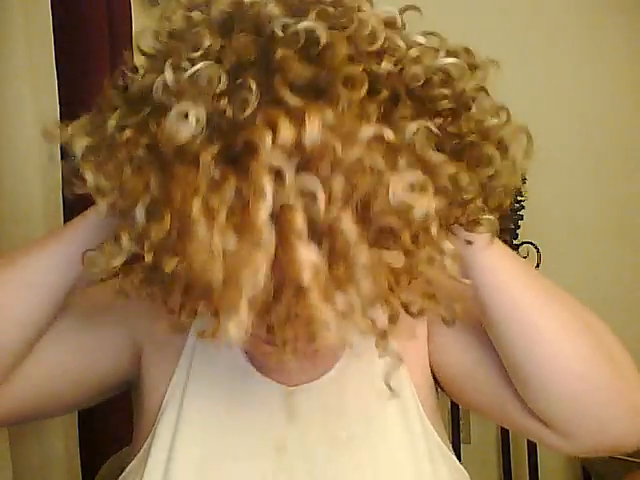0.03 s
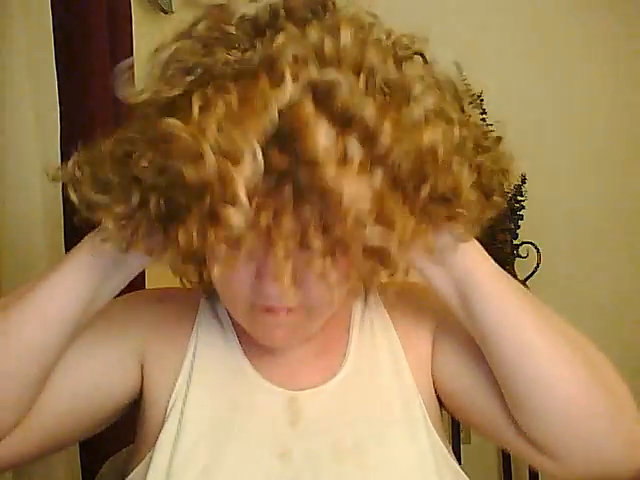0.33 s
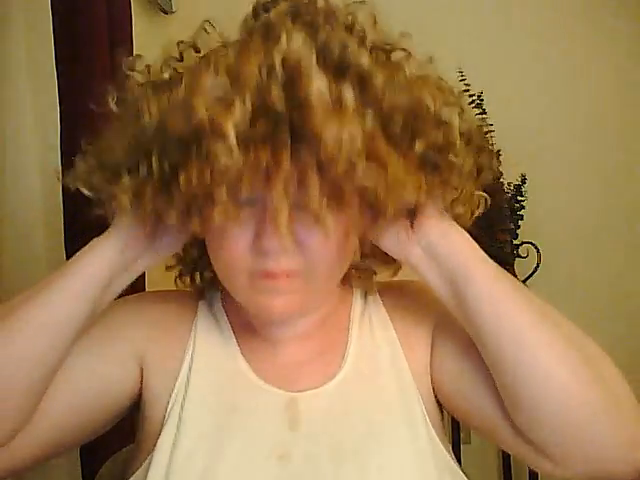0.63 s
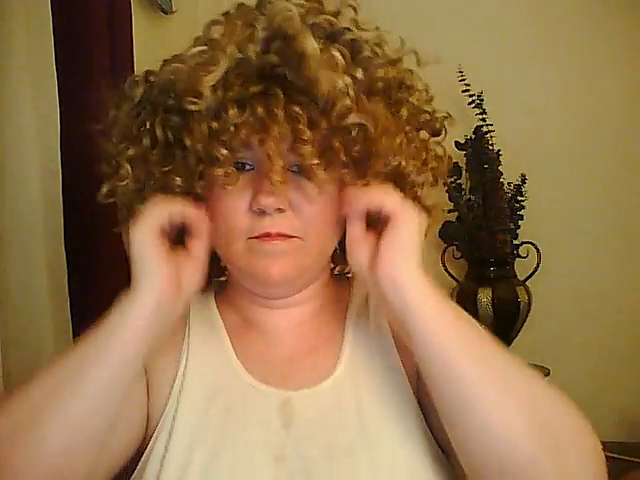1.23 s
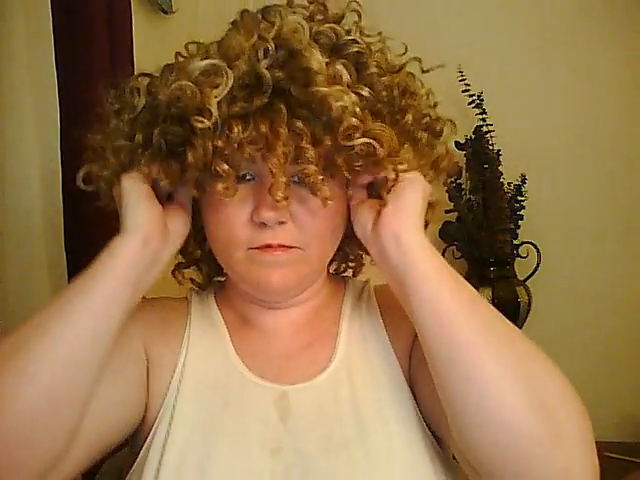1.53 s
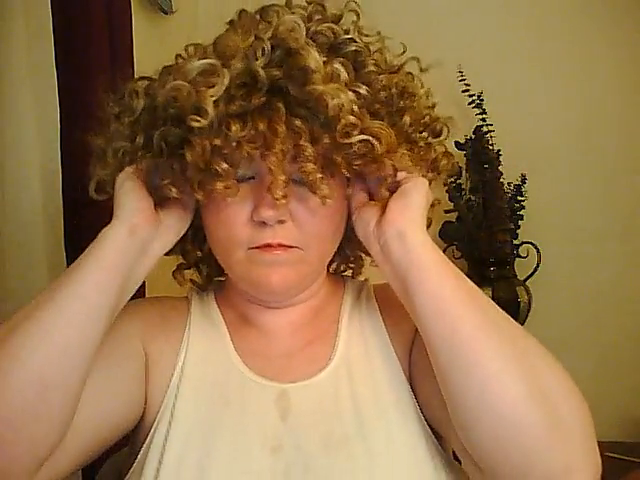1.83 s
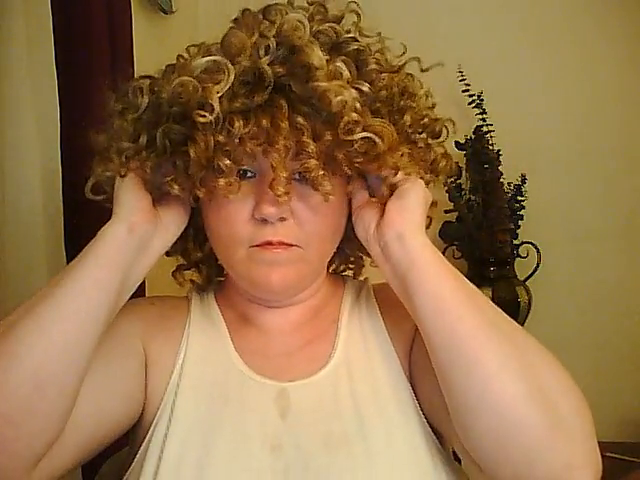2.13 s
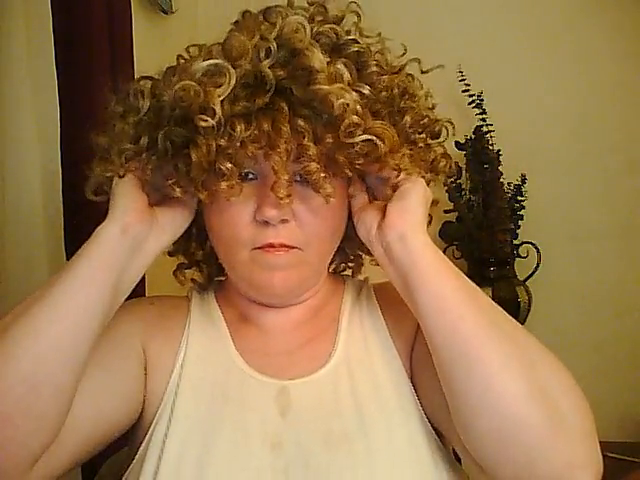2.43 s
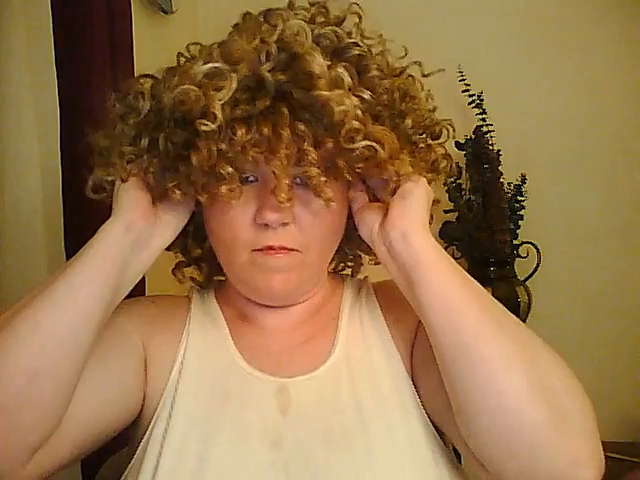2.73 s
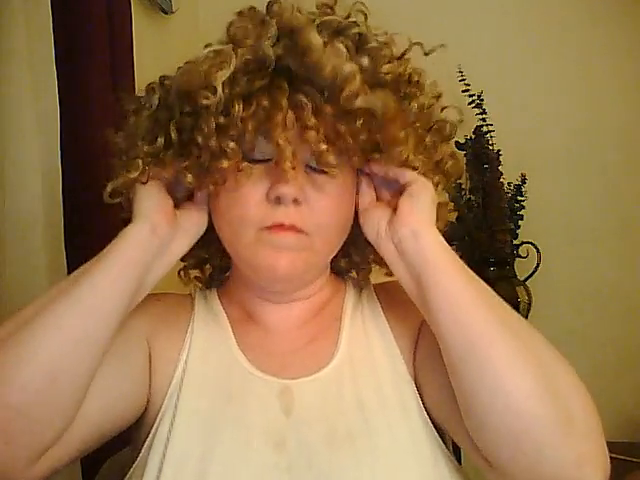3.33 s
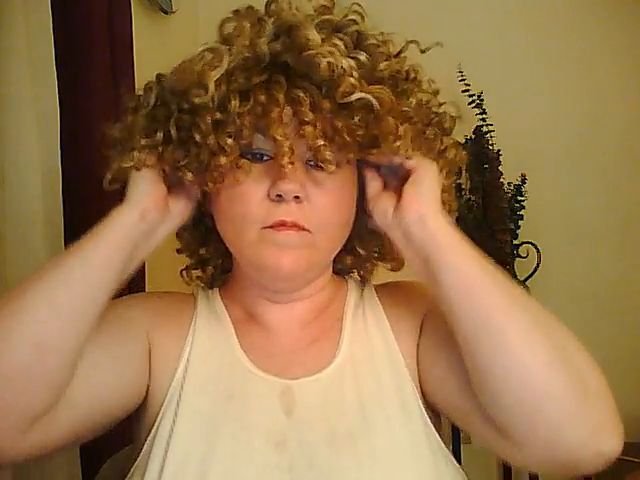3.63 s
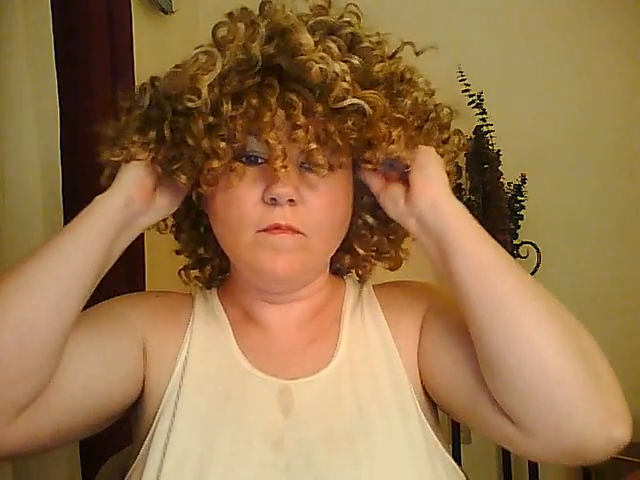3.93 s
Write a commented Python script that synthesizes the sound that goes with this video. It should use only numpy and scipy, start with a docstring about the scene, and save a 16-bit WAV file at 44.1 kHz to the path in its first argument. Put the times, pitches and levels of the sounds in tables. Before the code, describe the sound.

Faint, grainy rustling of wig hair comes first as a short shake, then as light, scattered rubs and small ticks of snapping strands. It is heard up close in a furnished room, over a steady low hum.

```python
"""First comes the soft, grainy hiss of a curly wig being shaken out close by, over a steady room hum.
The hiss is fibres sliding on each other. The wig is let go, then tugged into place with the
fingertips, which rub with a narrow lisp near 7 kHz. A few strands snap with tiny ticks.
The hum is a slow fan and an appliance motor; a faint, thin whistle swells twice as the wig rests."""
import sys
import numpy as np
from scipy import signal
from scipy.fft import rfft, irfft
from scipy.io import wavfile

SR = 44100
rng = np.random.default_rng(int(sys.argv[2]) if len(sys.argv) > 2 else 0)


def digitize_waveform(pressure):
    """Quantize a signal to 16-bit integers and store it at the path in sys.argv[1].

    Rows of a 2-D input are taken as channels; values are limited to [-1, 1].
    """
    field = np.atleast_2d(pressure).T
    bounded = np.clip(field, -1, 1)
    quanta = np.round(bounded * 32767).astype(np.int16)
    wavfile.write(sys.argv[1], SR, quanta)


N = 176400


def amp(db):
    """Turns decibels into a number to multiply a sound by."""
    return 10 ** (np.asarray(db) / 20)


def unit(x):
    """Scales a signal to an average strength (rms) of 1."""
    return x / np.sqrt(np.mean(x ** 2) + 1e-20)


def clock():
    """The time of every sample, in seconds."""
    return np.arange(N) / SR


def add(mix, start_s, sound):
    """Mixes a sound in at its start time."""
    part = mix[max(round(start_s * SR), 0):][:len(sound)]
    part += sound[:len(part)]


def colour(x, points):
    """Makes some frequencies louder than others; the result has strength 1."""
    hz, db = np.transpose(points)
    freqs = np.fft.rfftfreq(len(x), 1 / SR)
    gain = amp(np.interp(np.log(freqs + 1), np.log(hz), db))
    return unit(irfft(rfft(x) * gain, len(x)))


def drift(rate_hz):
    """A random wobble of strength 1, mostly slower than the given rate."""
    freqs = np.fft.rfftfreq(N, 1 / SR)
    keep_slow = np.exp(-(freqs / rate_hz) ** 2) * (freqs > 0)
    return unit(irfft(rfft(rng.standard_normal(N)) * keep_slow, N))


def resonate(x, hz, width_hz):
    """Keeps a band around one pitch, which may glide; the result has strength 1."""
    spin = np.exp(2j * np.pi * np.cumsum(hz * np.ones(len(x))) / SR)
    pole = np.exp(-np.pi * width_hz / SR)
    # Slide the band down to 0 Hz, smooth it, then slide it back up.
    smoothed = signal.lfilter([1], [1, -2 * pole, pole * pole], x / spin)
    return unit((spin * smoothed).real)


def friction(grains_per_s=3500, spread_db=3.5, grain_share=.55, flutter_db=.65):
    """Countless fibres slip: tiny clicks of uneven size in a fluttering hiss."""
    sizes = amp(spread_db * np.minimum(rng.exponential(1, N), 5))
    grains = sizes * rng.choice([-1, 1], N) * (rng.random(N) < grains_per_s / SR)
    hiss = np.sqrt(1 - grain_share) * rng.standard_normal(N)
    flutter = amp(flutter_db * drift(rate_hz=50))
    return (np.sqrt(grain_share) * unit(grains) + hiss) * flutter


# The tone colour of sliding curls. Each row: frequency in Hz, relative level in dB.
CURL_COLOUR = [(600, 4), (2000, 9.5), (3200, 6), (4900, 3), (6000, 5.5), (7200, 1.5), (9000, 3),
               (11000, 0.5), (13000, 1), (15500, 3)]
# How loud the shake is. Each row: time in seconds, level in dB.
SHAKE_LEVELS = [(0, -73), (.04, -67.5), (.12, -63), (.27, -63), (.33, -59.5), (.44, -59), (.55, -62),
                (.6, -68), (.72, -69), (.88, -78), (1.15, -85)]

def shaking():
    """The whole mass of curls slides over itself, then settles."""
    level_db = np.interp(clock(), *np.transpose(SHAKE_LEVELS))
    return amp(level_db) * colour(friction(), CURL_COLOUR)


def tone(hz, db, wander_hz):
    """A machine tone whose pitch wanders a little."""
    cycles = np.cumsum(hz + wander_hz * drift(rate_hz=2.75)) / SR + rng.random()
    return np.sqrt(2) * amp(db) * np.sin(2 * np.pi * cycles)


# The rush of air in the room. Each row: frequency in Hz, relative level in dB.
AIR_COLOUR = [(15, -19), (40, -17), (65, -1), (85, 1.5), (110, -8.5), (140, -4), (160, -2.5), (190, -8.5),
              (235, -18.5), (275, -13), (370, -18), (480, -15.5), (600, -19), (760, -19.5), (1000, -25),
              (1500, -27.5), (2800, -35.5), (5000, -46), (7000, -48.5), (10000, -52), (15500, -55)]
# The fan's tones. Each row: vibrations per turn of the fan, level in dB.
FAN_TONES = [(2, -62), (3, -64), (5, -36.6), (6, -62), (7, -57), (8, -52), (9, -61.5), (10, -56)]

def fan(turns_per_s=10.125):
    """Air rushes, and five blades make the strongest tone at five beats per turn."""
    air = amp(-45) * colour(rng.standard_normal(N), AIR_COLOUR)
    return air + sum(tone(per_turn * turns_per_s, db, wander_hz=.03) for per_turn, db in FAN_TONES)


# Mains hum and motor tones. Each row: pitch in Hz, level in dB, pitch wander in Hz.
HUM_TONES = [(119.8, -42, 0.049), (129.2, -53, .05), (195.9, -58, 0.34), (289, -67.5, 1.59),
             (301, -72.5, 0.27), (865, -73.5, 1.7), (928, -66.5, 2.1)]

def motor(whine_hz=462.8, whine_db=-52, turns_per_s=17.25):
    """An appliance hums, and its motor's whine wobbles in loudness and pitch with each turn."""
    throb = np.cos(2 * np.pi * (turns_per_s * clock() + rng.random()))
    whine = (1 + .43 * throb) * np.sin(2 * np.pi * whine_hz * clock() + .82 * throb)
    return amp(whine_db) * unit(whine) + sum(tone(*row) for row in HUM_TONES)


# Fingertips sliding. Each row: time in seconds, lisp level in dB, lisp pitch in Hz.
RUB_PATH = [(0, -81, 7150), (.13, -69.5, 7140), (.26, -70, 7300), (.34, -64.5, 7200), (.55, -70.5, 7240),
            (.65, -67.5, 7300), (.88, -77.5, 7200), (1.2, -85, 7000), (1.6, -90, 7000), (1.8, -75, 6800),
            (1.97, -82, 7000), (2.36, -76, 7300), (2.47, -79, 7200), (2.65, -79, 6700), (2.81, -81, 6800),
            (3.08, -77, 6800), (3.24, -73, 6700), (3.36, -85, 7000), (3.43, -72, 7300), (3.53, -77, 7460),
            (3.67, -71.5, 7800), (4, -73, 7560)]

def rubbing(curls_db=-1):
    """Fingertips creep through the hair with a lisp and stir the curls beside them."""
    times, db, hz = np.transpose(RUB_PATH)
    lisp = resonate(friction(), np.interp(clock(), times, hz), width_hz=1850)
    curls = amp(curls_db) * colour(friction(), CURL_COLOUR)
    return amp(np.interp(clock(), times, db)) * (lisp + curls)


# Snapping strands. Each row: start in seconds, level in dB, pitch in Hz.
STRAND_SNAPS = [(.169, -48, 8200), (0.5624, -40, 5800), (.5881, -52, 5800), (.999, -47, 6040),
                (1.767, -51, 5750), (1.883, -49, 7000), (2.045, -54, 6500), (2.912, -52, 6500),
                (3.143, -51, 5750), (3.325, -49, 5800)]

def ticks(click_s=.0002, ring_s=.002, echo_s=.0008, echo_db=-7):
    """A strand snaps free: a very short click, a faint ring and one close echo."""
    out, t = np.zeros(N), np.arange(SR // 20) / SR
    fade = np.exp(-t / click_s) + .12 * np.exp(-t / ring_s)
    for start, db, hz in STRAND_SNAPS:
        click = np.sin(2 * np.pi * hz * t) * fade
        add(out, start, amp(db) * click)
        add(out, start + echo_s, amp(db + echo_db) * click)
    return out


# Single strokes of the hands. Each row: middle in seconds, length in seconds, curl level in dB,
# extra curl brightness in dB per octave, lisp level in dB, lisp pitch in Hz.
HAND_STROKES = [(.33, 0.044, -62, 4, -71, 7450), (.42, 0.057, -63, -1, -72, 7000),
                (0.954, 0.054, -70, -2, -66, 8350), (0.981, 0.073, -60.5, -2, -71, 6300),
                (1.098, .025, -73, 2, -72, 5900), (1.675, .03, -71, 1, -75, 7000),
                (1.883, .02, -73, -3, -72, 7040), (2.32, .05, -72, -3, -74, 6300),
                (2.523, 0.028, -68, -2, -69, 7700), (2.565, 0.023, -69, 0, -63.5, 7100),
                (2.722, 0.018, -61, -4, -69, 6540), (2.757, .045, -70, 0, -75, 7000),
                (2.895, .05, -66, -3, -72.5, 6740), (3.09, 0.023, -72, 4, -79, 5800),
                (3.156, 0.037, -71, -4, -74, 5900), (3.235, 0.11, -68.5, 0, -76, 6000),
                (3.282, 0.076, -60, -3, -70, 6800), (3.415, .07, -68.5, 0, -81, 7000),
                (3.72, 0.28, -71, -1, -78, 5250), (3.867, 0.044, -67, -4, -66, 7200)]

def strokes():
    """Each tug or brush swells and fades, with its own mix of curls and finger lisp."""
    t, out = clock(), np.zeros(N)
    fibres, fingers = friction(), friction()
    for middle, length, curls_db, tilt_db, lisp_db, hz in HAND_STROKES:
        near = abs(t - middle) < 2 * length
        swell = np.exp(-2 * ((t[near] - middle) / length) ** 2)
        curls = colour(fibres[near], [(f, db + tilt_db * np.log2(f)) for f, db in CURL_COLOUR])
        lisp = resonate(fingers[near], hz, width_hz=2200)
        out[near] += swell * (amp(curls_db) * curls + amp(lisp_db) * lisp)
    return out


# How loud the whistle is. Each row: time in seconds, level in dB.
WHISTLE_LEVELS = [(0, -86), (1.15, -86), (1.36, -81), (1.55, -88), (1.75, -81), (2.0, -86), (2.6, -85),
                  (4, -86)]

def whistle():
    """A thin, faint whistle in the room swells twice."""
    level_db = np.interp(clock(), *np.transpose(WHISTLE_LEVELS))
    return amp(level_db) * resonate(rng.standard_normal(N), hz=4456, width_hz=45)


def room(x, fade_s=.25, echo_db=-19):
    """A furnished room adds soft echoes that drop by 60 dB in the fade time."""
    t = np.arange(SR // 2) / SR
    tail = rng.standard_normal(len(t)) * amp(-60 * t / fade_s) * (t > .004)
    echoes = signal.fftconvolve(x, tail / np.linalg.norm(tail))[:N]
    return x + amp(echo_db) * echoes


def scene():
    """The wig in front of the room's hum, in one channel."""
    background = fan() + motor() + whistle()
    wig = shaking() + rubbing() + strokes() + ticks()
    return (background + room(wig))[None]


def record(dry, cutoff_hz=15780):
    """Cuts away the very highest treble."""
    low_pass = signal.firwin(511, cutoff_hz, window=("kaiser", 9), fs=SR)
    return signal.oaconvolve(dry, low_pass[None], "same")


dry = scene()
out = record(dry)
digitize_waveform(out)
```